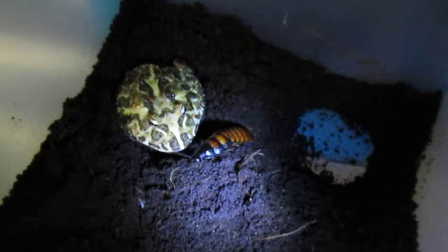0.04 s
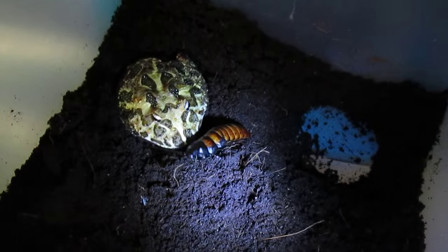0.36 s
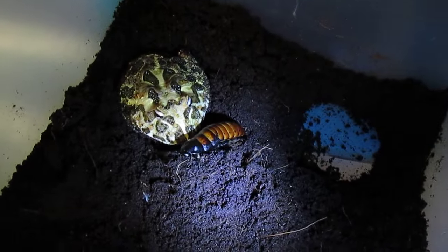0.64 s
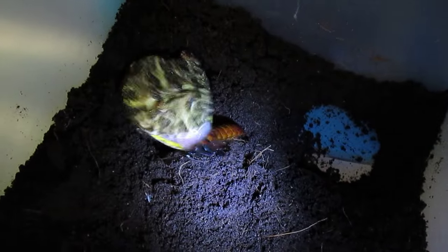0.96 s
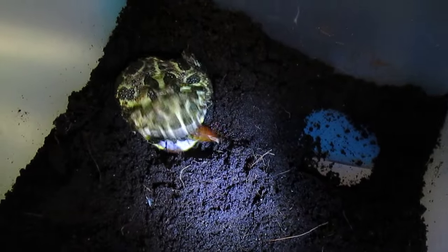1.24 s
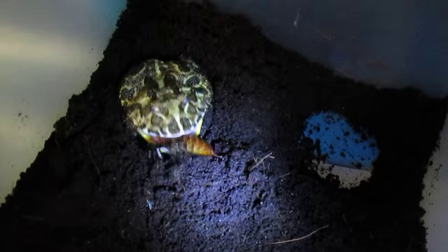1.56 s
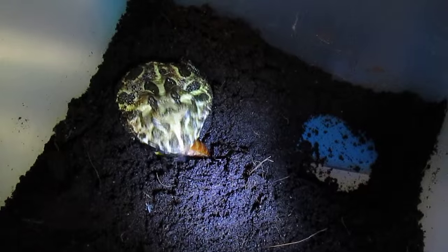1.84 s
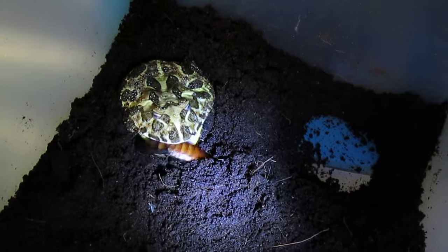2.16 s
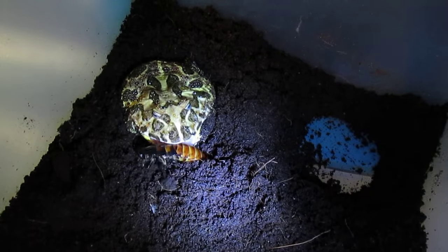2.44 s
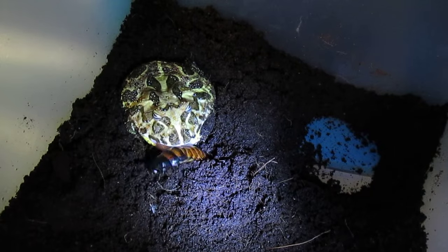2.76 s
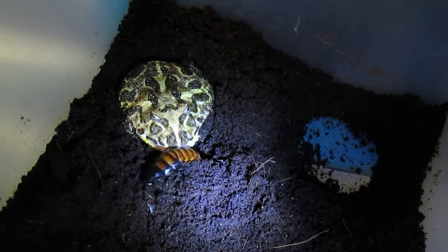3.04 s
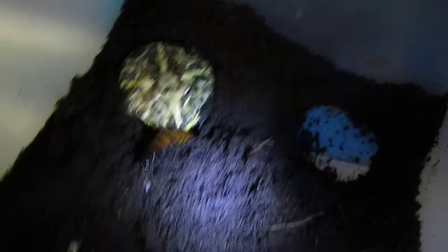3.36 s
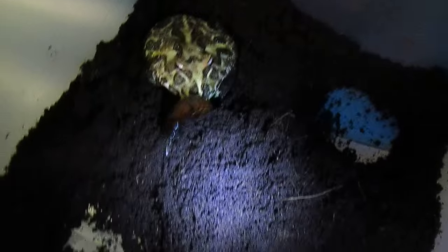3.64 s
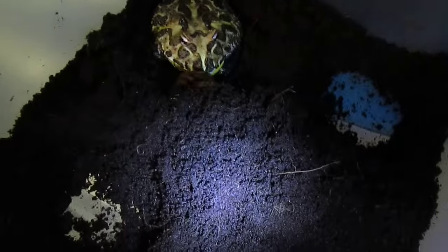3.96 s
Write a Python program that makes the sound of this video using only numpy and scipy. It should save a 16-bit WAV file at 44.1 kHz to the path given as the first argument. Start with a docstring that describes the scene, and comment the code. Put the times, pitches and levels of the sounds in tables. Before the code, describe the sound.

A cockroach hisses five times as a frog snaps it up, over a low room rumble.

```python
"""On the soil of a small plastic tank, a frog snaps up a hissing cockroach, heard from close by.
Two wet snaps and a scuffle lead to five hisses: air forced through the roach's spiracles breaks
into turbulent jets. Reflections from the tank walls interfere with the direct sound and colour
each hiss differently as the roach twists. Room ventilation rumbles behind."""
import sys
import numpy as np
from scipy import signal
from scipy.fft import rfft, irfft, next_fast_len
from scipy.io import wavfile
from scipy.ndimage import map_coordinates

SR = 44100
rng = np.random.default_rng(int(sys.argv[2]) if len(sys.argv) > 2 else 0)


def inscribe(sig):
    """Save sig as 16-bit PCM at rate SR to the path in sys.argv[1].

    A 1-D sig is mono; a 2-D sig holds one channel per row.
    Samples are clipped to [-1, 1] before scaling.
    """
    pcm = np.round(np.clip(np.atleast_2d(sig).T, -1, 1) * 32767)
    wavfile.write(sys.argv[1], SR, pcm.astype(np.int16))


N = 176400

# Likeness of the animals' sound at the two ears: (frequency [Hz], correlation [-1..1])
ANIMAL_CORRELATION = [(1500, 0.84), (3000, 0.12), (5200, 0.48), (7000, 0.42), (9500, 0.75), (11500, -0.43),
                      (13000, -.3), (15500, 0.5)]


def amp(db):
    """Amplitude ratio of a level in decibels."""
    return 10 ** (np.asarray(db) / 20)


def unit(x):
    """Normalisation to rms 1."""
    return x / np.sqrt(np.mean(x ** 2) + 1e-20)


def along(points, hz):
    """Interpolation of (frequency [Hz], value) points on a logarithmic frequency axis."""
    f, v = np.transpose(points)
    return np.interp(np.log(hz + 1), np.log(f + 1), v)


def bumps(rows, hz):
    """Gain of resonance peaks or notches, each a Lorentzian curve in decibels."""
    return amp(sum(db / (1 + (2 * (hz - centre) / width) ** 2) for centre, width, db in rows))


def envelope(rows):
    """Amplitude envelope through (time [s], level [dB]) points, silent outside them."""
    s, db = np.transpose(rows)
    return amp(np.interp(np.arange(N) / SR, s, db, left=-np.inf, right=-np.inf))


def wobble(knots_per_s):
    """Smooth random modulation: a spline through Gaussian knots."""
    knots = rng.standard_normal(int(N * knots_per_s / SR) + 4)
    return map_coordinates(knots, [np.arange(N) * knots_per_s / SR])


def filtered(x, response):
    """Linear filtering: the spectrum of x times a frequency response."""
    size = next_fast_len(N + SR // 4)
    return irfft(rfft(x, size) * response(np.fft.rfftfreq(size, 1 / SR)), size)[..., :N]


def side_angle(correlation, hz):
    """Mid/side mixing angle [rad] that gives independent noises a left-right correlation."""
    return np.arccos(np.clip(along(correlation, hz), -1, 1)) / 2


def stereo_noise(spectrum, correlation):
    """Partially coherent noise of rms 1 with a given spectrum."""
    def response(hz):
        angle = side_angle(correlation, hz)
        return amp(along(spectrum, hz)) * [np.cos(angle), np.sin(angle)]
    mid, side = filtered(rng.standard_normal((2, N)), response)
    return unit(np.array([mid + side, mid - side]))


def ventilation():
    """Broadband flow noise, coloured by faint resonances, rumbles at a nearly steady level."""
    # Rumble spectrum: (frequency [Hz], relative level [dB])
    spectrum = [(15, -9), (25, -3), (38, -15), (55, -4.5), (98, -4), (138, -17.5), (165, -1), (195, -2.5),
                (238, 0.5), (290, -4), (347, -3), (392, -16), (435, -10.5), (515, -14), (600, -9),
                (760, -11.5), (890, -10), (1060, -16.5), (1250, -16), (1800, -21), (2350, -28.5),
                (3070, -25.5), (4500, -34.5), (7300, -35), (9100, -38.5), (10200, -44.5), (12200, -41),
                (14300, -41.5), (15800, -48)]
    # Likeness at the two ears: (frequency [Hz], correlation [-1..1])
    correlation = [(60, 0.55), (120, 0.78), (240, 0.97), (480, 0.74), (950, 0.83), (1890, 0.42),
                   (3770, -0.099), (7520, -0.12), (15000, 0.025)]
    # Faint resonances in the room's background noise: (frequency [Hz], width [Hz], gain [dB])
    faint_resonances = [(246.6, 11.7, 2.1), (324.5, 8.8, 2.06), (557, 19, 4.9), (603, 6.5, 9.5),
                        (865, 22, 4.4), (6900, 150, 2), (9130, 100, 5.7)]
    level_db = -39 + 0.66 * wobble(knots_per_s=8.02)
    flow = stereo_noise(spectrum, correlation)
    return amp(level_db) * unit(filtered(flow, lambda hz: bumps(faint_resonances, hz)))


def scuffle():
    """Shot noise: soil crumbs under the struggling animals give a dense train of random impulses."""
    # Course of the struggle: (time [s], level [dB])
    levels = [(.92, -80), (.96, -55), (1.0, -64), (1.06, -60), (1.12, -51), (1.143, -46.5), (1.155, -36.5),
              (1.19, -41), (1.24, -44), (1.33, -75)]
    # Soil spectrum: (frequency [Hz], relative level [dB])
    spectrum = [(300, -1), (1200, -1.5), (2600, 0.5), (4000, -6.5), (5300, 3), (9000, -4.5), (15500, -4.5)]
    crumbs_per_s, spread_db = 3300, 4
    impacts = rng.uniform(0, 1, N) < crumbs_per_s / SR
    crumbs = impacts * amp(spread_db * rng.standard_normal(N))
    pair = crumbs * (rng.standard_normal(N) + rng.standard_normal((2, N)))  # common part + each ear's
    return envelope(levels) * unit(filtered(pair, lambda hz: amp(along(spectrum, hz))))


def snaps():
    """Impact transients: snaps of the jaws and ticks of the shell are noise that decays exponentially."""
    # Impacts: (time [s], relative level [dB], 60 dB decay time [s], tilt [dB/octave])
    impacts = [(.977, -39, .008, 0), (0.9807, -28.5, 0.02, -4.5), (1.0238, -18, .012, 8.5),
               (1.133, -40, .02, 2), (1.1505, -32, .018, 1), (1.157, -37, 0.023, 2), (1.852, -21, .008, 2),
               (3.546, -34, 0.029, -2)]
    # Impact spectrum before tilting: (frequency [Hz], relative level [dB])
    spectrum = [(250, -38), (800, -17), (1500, -6), (4000, -13), (6000, -0.5), (9000, -1), (15500, -7)]
    rise_s = 0.0006
    out = np.zeros((2, N))
    for start, db, t60, tilt in impacts:
        age = np.maximum(np.arange(N) / SR - start, 0)
        tilted = [(hz, level + tilt * np.log2(hz / spectrum[0][0])) for hz, level in spectrum]
        crack = stereo_noise(tilted, ANIMAL_CORRELATION)
        out += crack * amp(db - 60 * age / t60) * (1 - np.exp(-age / rise_s))
    return out


def wall_echoes(x, count=8):
    """Comb filtering: echoes from the near walls interfere, their delays drifting as the roach twists."""
    near_s, far_s, twist_s_per_s = 0.000392, 0.006, 0.00018
    n, out = np.arange(len(x)), np.zeros(len(x))
    fine = signal.resample_poly(x, 4, 1)  # oversampled for fractional delays
    fine_n = np.linspace(0, len(x), len(fine), endpoint=False)
    for place, drift, weight in rng.uniform(0, 1, (count, 3)):
        delay_s = near_s + (far_s - near_s) * place ** 2 + twist_s_per_s * (2 * drift - 1) * n / SR
        echo = np.interp(n - delay_s * SR, fine_n, fine)
        out += (weight + 0.5) * rng.choice([-1, 1]) * echo
    return unit(out)


def hiss(levels, spectrum):
    """Turbulent jet noise arrives directly and off the walls, whose echoes decorrelate the two ears."""
    # Treble shelf above shelf_hz: (time [s], gain [dB])
    shelf = [(1.2, -2), (1.32, 3), (1.5, 3.5), (1.84, -5), (1.92, 2.5), (1.98, -1), (2.35, 3.5),
             (2.91, 1.5), (3.3, 0), (3.58, 0), (3.8, 3.5), (3.92, -1)]
    shelf_hz, jet_db, flutter_db, wall_gain = 13100, 0.5, 0.4, 0.55
    gain = envelope(levels) * amp(flutter_db * wobble(knots_per_s=70))  # the jet is unsteady
    blowing = gain > 0
    jet = rng.standard_normal(N)[blowing]
    paths = np.zeros((2, N))  # mid, side
    paths[0, blowing] = unit(jet + wall_gain * wall_echoes(jet))
    paths[1, blowing] = wall_echoes(jet)

    def response(hz):
        side_gain = np.tan(np.minimum(side_angle(ANIMAL_CORRELATION, hz), np.pi / 3))
        return amp(along(spectrum, hz)) * [np.ones_like(hz), side_gain]
    coloured = filtered(paths, response)
    treble = filtered(coloured, lambda hz: 1 - 1 / (1 + (hz / shelf_hz) ** 20))
    shelf_gain = amp(np.interp(np.arange(N) / SR, *np.transpose(shelf)))
    mid, side = coloured + treble * (shelf_gain - 1)
    return amp(jet_db) * gain * np.array([mid + side, mid - side]) / np.std(mid[blowing])


def cockroach():
    """Forced exhalation through the spiracles: five hisses, the second in two pushes of air."""
    # Jet strength, one list a push: (time [s], relative level [dB])
    pushes = [
        [(1.192, -54), (1.198, -29), (1.206, -27), (1.213, -19), (1.235, -19), (1.263, -25), (1.311, -28.5),
         (1.343, -36), (1.439, -30.5), (1.48, -36.5), (1.51, -44.5), (1.547, -46), (1.57, -75)],
        [(1.817, -67), (1.824, -30.5), (1.849, -20.5), (1.858, -25.5), (1.93, -26), (1.95, -37.5)],
        [(1.933, -39), (1.946, -22), (1.98, -24), (2.034, -26.5), (2.08, -28.5), (2.112, -25), (2.135, -41),
         (2.16, -72)],
        [(2.32, -94), (2.34, -33), (2.354, -28.5), (2.552, -29), (2.68, -31.5), (2.696, -40), (2.714, -68),
         (2.73, -64)],
        [(2.88, -74.5), (2.896, -35), (2.904, -28), (2.932, -26.5), (3.022, -30), (3.264, -26.5), (3.31, -30.5),
         (3.35, -72)],
        [(3.55, -39.5), (3.554, -52.5), (3.566, -34), (3.596, -33), (3.698, -38), (3.786, -31.5),
         (3.886, -38.5), (3.94, -34), (4.0, -34)],
    ]
    # Jet spectrum, one list a push: (frequency [Hz], relative level [dB])
    spectra = [
        [(710, -50), (1200, -19.5), (2200, -21), (3150, -28), (3850, -37.5), (4150, -19), (4550, -22),
         (5200, -5), (6300, -10.5), (7550, -1.5), (8200, -5), (9500, 2), (10000, -2.5), (11200, -9.5),
         (12200, -8.5), (15100, -11.5), (16000, -17)],
        [(710, -59), (1200, -19), (2200, -22.5), (2950, -21), (3850, -35), (4200, -19), (5120, -8.5),
         (6430, -9), (7410, -2.5), (9400, 1), (10700, -8), (13000, -8), (14700, -7), (16000, -10.5)],
        [(710, -50), (1200, -23), (2000, -23.5), (2950, -18.5), (3850, -37), (4250, -19), (5120, -8.5),
         (6000, -8), (7500, -4), (9710, 0.5), (10900, -6), (11800, 0), (13700, -16), (16000, -13)],
        [(710, -49), (1200, -21), (1290, -24), (1810, -12.5), (2320, -23.5), (2730, -17), (3010, -29),
         (3320, -19.5), (3950, -19), (4170, -17), (5120, -7.5), (5710, -8.5), (7490, -0.5), (9400, 0),
         (10600, -6), (11500, -4), (14700, -11), (16000, -24)],
        [(710, -53), (1200, -29), (1730, -18.5), (2130, -26), (2300, -25), (2620, -22), (3910, -22.5),
         (4130, -17.5), (4960, -11.5), (5530, -11.5), (6650, -4.5), (7900, -8), (8710, 2), (10100, -7.5),
         (11300, -3.5), (13300, -9), (15500, -16.5), (16000, -24)],
        [(1060, -29), (1800, -14), (2160, -20), (2620, -11), (3060, -27), (3350, -10.5), (3670, -30),
         (3840, -14), (4410, -18), (5050, -6), (5740, -14), (6590, -0.5), (7690, -4), (8200, 0), (10300, -0.5),
         (13400, -11), (15000, -6.5), (16000, -10.5)],
    ]
    return sum(hiss(levels, spectrum) for levels, spectrum in zip(pushes, spectra))


def tank_reverb(x, t60_s=0.054, gain_db=-8):
    """Reverberation: dense reflections in the small enclosure die away exponentially."""
    t = np.arange(SR // 6) / SR
    tail = rng.standard_normal((2, len(t))) * amp(-60 * t / t60_s)
    return amp(gain_db) * signal.fftconvolve(x, tail / np.linalg.norm(tail[0]), axes=1)[:, :N]


def scene():
    """Superposition of the animals, the tank's reverberation and the room's rumble."""
    animals = cockroach() + snaps() + scuffle()
    return animals + tank_reverb(animals) + ventilation()


def record(dry, top_hz=15800):
    """Notch and low-pass filtering: two narrow bands are weakened and the highest treble is cut."""
    # Notches: (frequency [Hz], width [Hz], gain [dB])
    notches = [(3950, 120, -7), (7880, 70, -17)]
    return filtered(dry, lambda hz: bumps(notches, hz) * (hz < top_hz))


dry = scene()
out = record(dry)
inscribe(out)
```